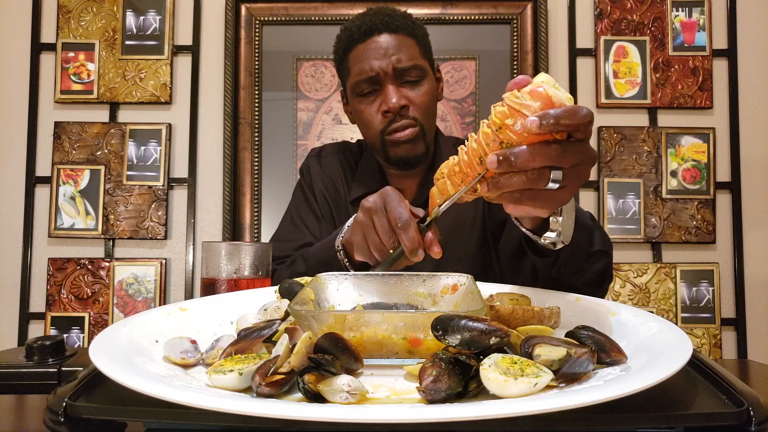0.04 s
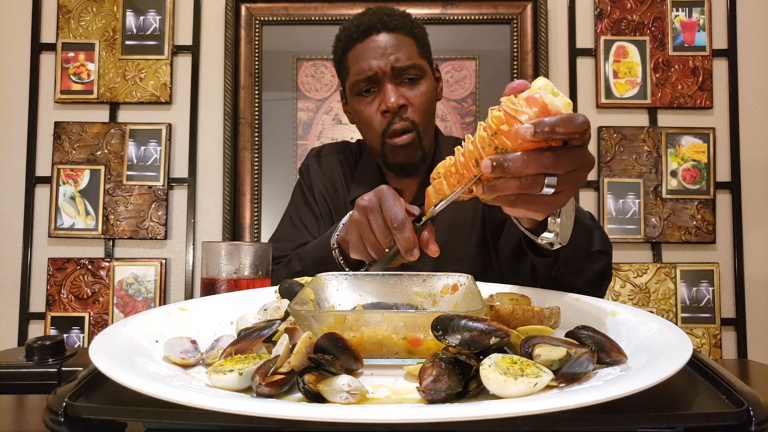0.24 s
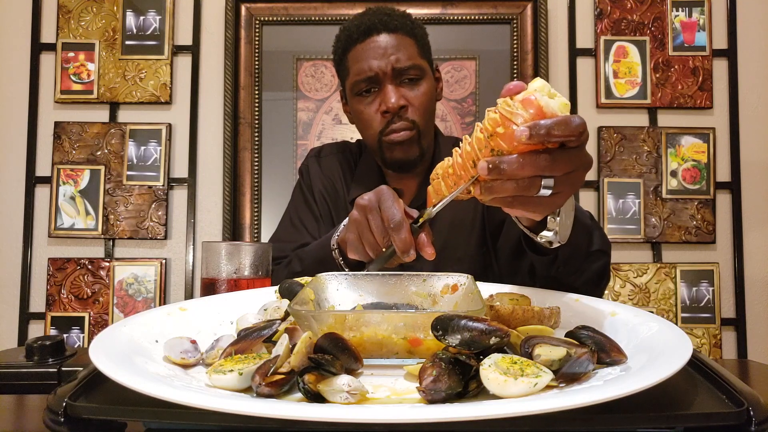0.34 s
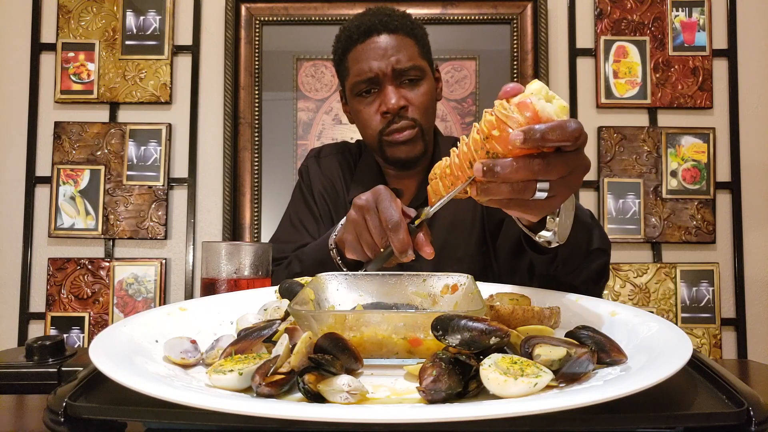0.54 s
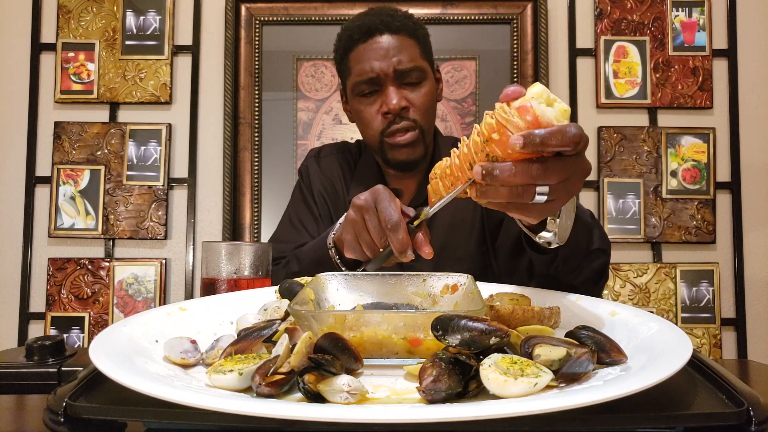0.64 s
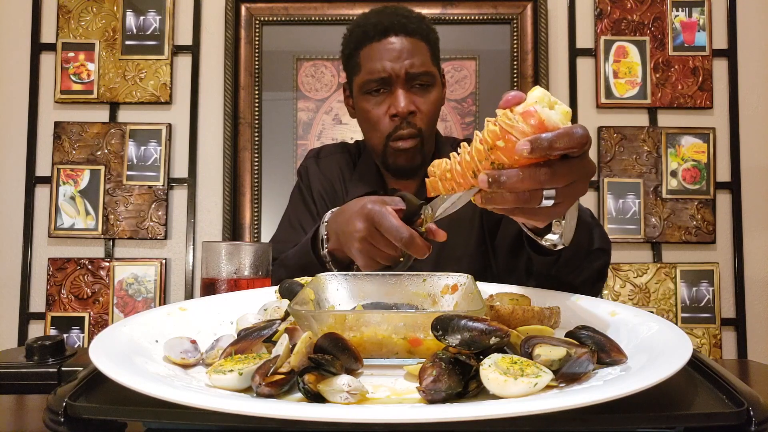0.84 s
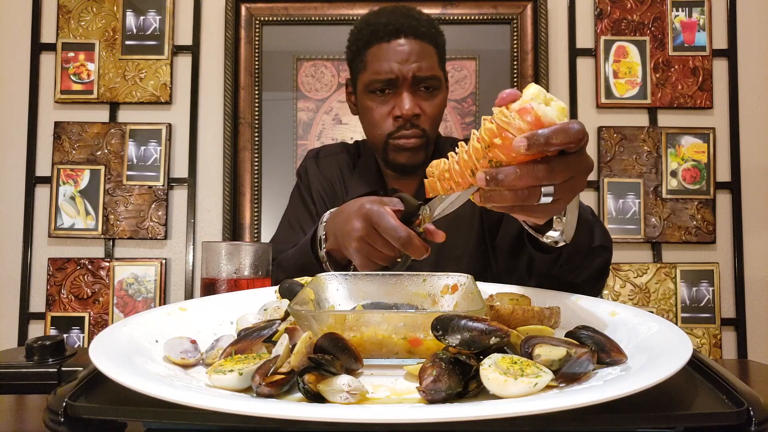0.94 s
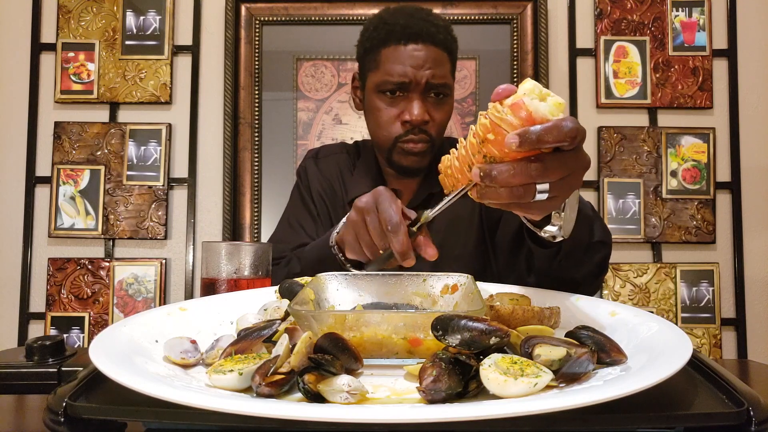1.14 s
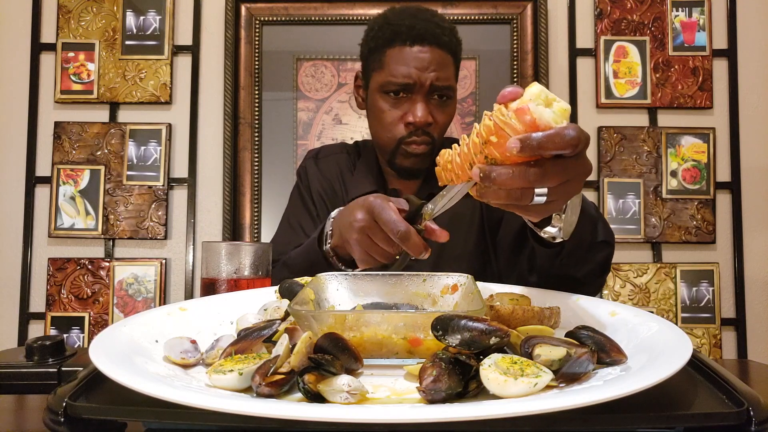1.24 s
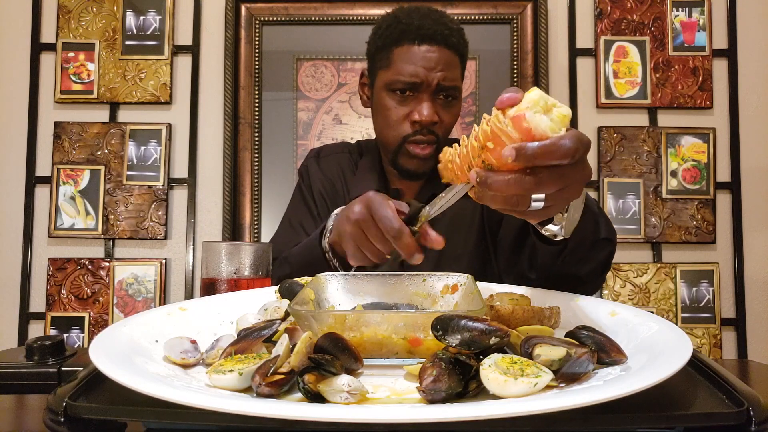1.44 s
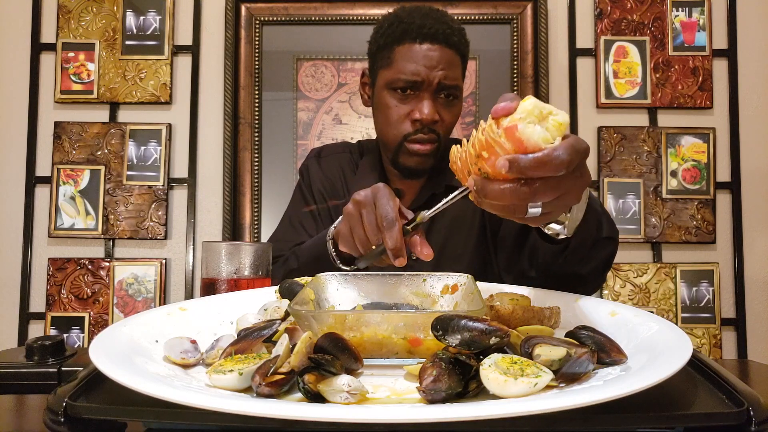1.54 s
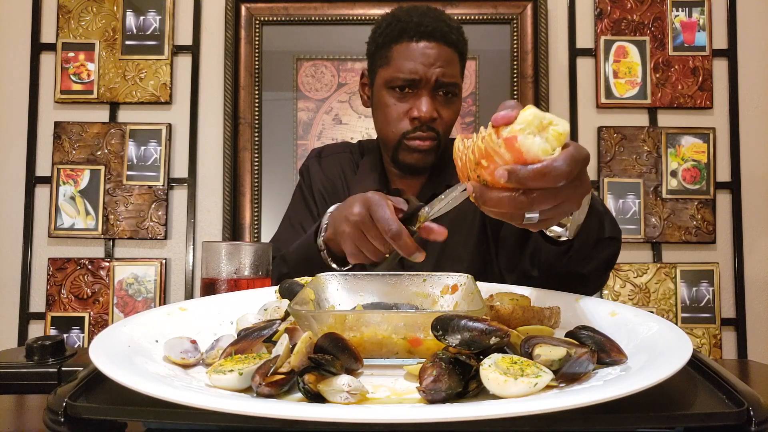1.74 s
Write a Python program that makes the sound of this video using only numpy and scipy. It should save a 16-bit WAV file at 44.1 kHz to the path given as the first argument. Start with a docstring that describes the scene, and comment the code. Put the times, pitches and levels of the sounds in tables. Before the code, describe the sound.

Kitchen shears cut a hollow lobster shell at arm's length from the microphone: a loud crunching burst early, another sharp crack around the middle, then a smaller snap, with light ticks and dull bumps between, indoors.

```python
"""A dining table in a small room: kitchen shears work through a lobster shell, an arm's length from the microphone.
Each fracture is a click that rings the hollow shell for a few ms, with a bright tick on top. Dense tiny fractures
crackle between the cuts and swell around some of the big snips; hands bump the table in dull knocks of about one
swing. Single reflections answer each snap after 8 to 42 ms, a short dense tail follows, and shaped noise is the
room tone."""
import sys
import numpy as np
from scipy import signal
from scipy.fft import rfft, irfft
from scipy.io import wavfile

SR = 44100
rng = np.random.default_rng(int(sys.argv[2]) if len(sys.argv) > 2 else 0)


def nominal_scale(level):
    """Amplitude ratio for a level in decibels (scalar or array-like)."""
    x = np.asarray(level, float) / 20
    return 10 ** x


def master_out(mix):
    """Clip the mix to full scale and print it as 16-bit PCM to the path in sys.argv[1]."""
    frames = np.transpose(np.atleast_2d(mix))
    ceiling = np.clip(frames, -1, 1)
    pcm = np.round(ceiling * 32767).astype(np.int16)
    wavfile.write(sys.argv[1], SR, pcm)


N = 79380  # samples, 1.8 s
LEAD_S = 0.1  # run-in that is cut off, so sounds begun at negative times are still ringing at the start


def evened(x):
    """Scales a sound to an rms of 1."""
    return x / np.sqrt(np.mean(x ** 2) + 1e-20)


def like(x, other):
    """Gives x the energy of the other sound."""
    return x * np.linalg.norm(other) / np.linalg.norm(x)


def read(points, hz):
    """Reads a (frequency, value) curve along a log frequency axis."""
    f, value = np.transpose(points)
    return np.interp(np.log(hz + 1), np.log(f + 1), value)


def add(mix, s, sound):
    """Mixes a sound in at a time in seconds, counted from the end of the run-in."""
    part = mix[round((s + LEAD_S) * SR):][:len(sound)]
    part += sound[:len(part)]


def high_pass(hz):
    """Second-order low cut."""
    return signal.butter(2, hz, "high", fs=SR, output="sos")


RING_SAMPLES = 1500
SCATTER = 0.044  # random spread of the mode pitches, as a share of the pitch
ONSET_S = 0.00011  # rise time if the lowest mode were 1 kHz; longer for a lower one


def ring(modes, chance, region=0, reach=99):
    """Decaying sines of alternating sign and slightly shifted pitch, strongest near the struck region; peak 1."""
    hz, db, t60 = np.transpose(modes)[:, :, None]
    t = np.arange(RING_SAMPLES) / SR
    sign = (-1) ** np.arange(len(hz))[:, None]
    octaves_away = np.log2(hz / 1000) - region
    db = db - 6 * (octaves_away / max(reach, 0.15)) ** 2
    shifted_hz = hz * (1 + SCATTER * chance[:len(hz), None])
    y = sign * nominal_scale(db - 60 * t / t60) * np.sin(2 * np.pi * shifted_hz * t)
    y = y.sum(0) * (1 - np.exp(-t * hz.min() / 1000 / ONSET_S))
    return y / abs(y).max()


# Modes of the hollow shell: (mean frequency [Hz], relative level [dB], decay by 60 dB [s])
SHELL_MODES = [(520, 0, 0.011), (659, -4, 0.038), (839, -5, 0.026), (1267, 1.5, 0.0073), (1566, 0, 0.015),
               (1885, 4, 0.0062), (2536, 7, 0.0046), (3350, 1.5, 0.0043), (4304, 3.5, 0.0038)]
# Brittle edge modes of the tick: (mean frequency [Hz], relative level [dB], decay by 60 dB [s])
EDGE_MODES = [(7010, 2, 0.0028), (8443, 0, 0.0052), (9250, -2.5, 0.0043), (10764, 3.5, 0.0035),
              (11300, -4.5, 0.0022), (13150, -6.5, 0.007), (14900, -10, 0.0039)]
# Fractures: (time [s], shell peak level [dB], struck region [octaves above 1 kHz],
# reach to 6 dB down [octaves], tick peak level [dB])
FRACTURES = [(-.05, -9, 0.14, 0.57, -8), (-.045, -11, 1.8, 0.29, -24), (-.04, -11, 1, 1.7, -12.5),
             (0.1087, -26.5, 0.94, 1.57, -58.5), (0.16, -58, 8, .5, -37.5), (.166, -44, 2.2, 0.35, -50),
             (.200, -41.5, -0.5, 0.93, -67), (0.217, -11, 1.42, 0.26, -28), (.2195, -25, -0.32, 0.54, -55),
             (.308, -21, 1.5, 1.18, -26.5), (.352, -8, 1.4, 0.71, -20.5), (.354, -3.5, 1.5, 0.67, -19),
             (.356, -5, 0.56, 0.61, -15.5), (0.3588, -9.5, 1.04, 1.4, -9.5), (.360, -12, -.6, .3, -11.5),
             (.3612, -5.5, 1.3, 0.83, -0.5), (.362, -2.5, 2.7, 1.1, -28), (.364, -4.5, 1.67, 0.73, -6),
             (0.535, -32, 2.5, 0.92, -44), (0.6062, -26, 0.6, 0.28, -52), (.6085, -19.5, 0, .6, -52),
             (0.6476, -24.5, 1.7, 0.63, -24), (0.681, -39.5, -0.2, 0.58, -39), (.684, -23.5, .8, 1.44, -36),
             (.700, -30.5, 0.45, 0.42, -46), (0.703, -53, 1.5, 0.51, -55), (0.7102, -34.5, 1.5, 0.4, -44),
             (0.7535, -29.5, 1.8, .8, -33.5), (.760, -31, 6, 0.28, -27), (0.778, -29.5, 1.5, 0.4, -26),
             (0.883, -58, -5, 0.68, -43), (0.909, -68, 3, 0.71, -35), (.966, -53.5, 1.5, 0.8, -76),
             (1.005, -24.5, 2.53, 1.28, -19.5), (1.0457, -44, 3, 1.1, -60), (1.061, -47, -7, 0.93, -40),
             (1.0722, -11.5, 1.54, 0.59, -7), (1.0769, -6, 1.54, .8, -2.5), (1.0803, -37, .8, 0.41, -13),
             (1.2205, -35.5, 0, 0.59, -54), (1.238, -36, 0.2, 0.59, -83.5),
             (1.302, -43.5, 1.9, 0.21, -75.5), (1.311, -38, 0.3, 0.46, -64), (1.3147, -38.5, 0, 0.85, -64),
             (1.3495, -41, 0.8, 0.38, -62), (1.426, -60, 3.3, 0.83, -69.5), (1.455, -66, 1, .6, -56),
             (1.4595, -66, -13.5, .6, -69), (1.469, -47.5, 1, .5, -56), (1.4745, -48, 1, 1.1, -41),
             (1.497, -39.5, 0.8, 0.73, -69), (1.514, -62, 4, 0.8, -46), (1.5178, -58, 1, .6, -42),
             (1.5365, -30, 0.44, 0.65, -52), (1.5421, -16, 1.8, 0.25, -10),
             (1.5425, -13.5, 0.42, 0.51, -24.5), (1.703, -50, 4, .6, -34)]
BREAK_S = 0.00008  # decay time of the ragged break
BLUR = 1.48  # summed over all directions, a fracture reaches over more of the modes
SPREAD_LOW_HZ, SPREAD_TICK_DB = 2620, -2.5  # and its tick is even above a low cut


def fractures(size):
    """Row 0, to the microphone: a ragged break rings the edge modes, shell modes ring alongside. Row 1: to the room."""
    out = np.zeros((2, size))
    chances = rng.standard_normal((len(FRACTURES), 100))
    even_click = signal.sosfilt(high_pass(SPREAD_LOW_HZ), np.arange(RING_SAMPLES) == 0)
    for (s, shell_db, region, reach, tick_db), chance in zip(FRACTURES, chances):
        ragged = chance[20:] * np.exp(-np.arange(80) / SR / BREAK_S)
        tick = np.convolve(ragged, ring(EDGE_MODES, chance[10:]))[:RING_SAMPLES]
        tick = nominal_scale(tick_db) * tick / abs(tick).max()
        body = nominal_scale(shell_db) * ring(SHELL_MODES, chance, region, reach)
        add(out[0], s, body + tick)
        spread_body = like(ring(SHELL_MODES, -chance, region, reach * BLUR), body)
        spread_tick = nominal_scale(SPREAD_TICK_DB) * like(even_click, tick)
        add(out[1], s, spread_body + spread_tick)
    return out


# Blade pressure, heard as crackle that swells around some of the big snips: (time [s], level [dB])
PRESSURE = [(0, -50), (.2, -70), (0.299, -69.5), (.35, -57), (.356, -19), (0.378, -25), (0.419, -56),
            (.55, -53), (.62, -52), (.72, -64.5), (0.781, -42), (.84, -68), (1, -63), (1.04, -48.5),
            (1.071, -54), (1.08, -23.5), (1.098, -36), (1.14, -43), (1.2, -51), (1.33, -78.5),
            (1.451, -69.5), (1.481, -54), (1.538, -58.5), (1.547, -37.5), (1.565, -39), (1.6, -53.5),
            (1.7, -65.5), (1.8, -61.5)]
CRACKLE_PER_S = 1200  # mean rate over all three regions
CRACKLE_SPREAD_DB, CRACKLE_TICK_DB = 4.5, -8.5  # scale of the random click levels; tick against shell


def crackle(size):
    """Tiny random fractures, low, middle or high on the shell modes, follow the blade pressure."""
    out = np.zeros(size)
    for region in (0.2, 1.1, 1.8):  # octaves above 1 kHz
        strength = nominal_scale(CRACKLE_SPREAD_DB * np.minimum(rng.exponential(1, size), 4))
        clicks = strength * (rng.random(size) < CRACKLE_PER_S / 3 / SR)
        chance = rng.standard_normal(20)
        body = ring(SHELL_MODES, chance, region, 0.86)
        tick = nominal_scale(CRACKLE_TICK_DB) * ring(EDGE_MODES, chance[10:])
        out += signal.oaconvolve(clicks, body + tick)[:size]
    s, db = np.transpose(PRESSURE)
    return evened(out) * nominal_scale(np.interp(np.arange(size) / SR - LEAD_S, s, db))


# Bumps through hand and table: (time [s], relative level [dB], settled pitch [Hz])
BUMPS = [(-.03, -21.5, 310), (.1, -53.5, 70.6), (.219, -33.5, 324), (0.36, -53, 202), (.443, -25, 190),
         (0.488, -48.5, 70), (.608, -40.5, 423), (.696, -36, 306), (0.744, -40.5, 320), (0.944, -50.5, 252),
         (0.966, -45.5, 260), (.986, -44, 300), (1.008, -25, 187), (1.0465, -40, 400), (1.055, -61.5, 252),
         (1.078, -44, 320), (1.099, -51, 67.6), (1.221, -44, 342), (1.51, -53, 248), (1.539, -48.5, 182),
         (1.781, -53.5, 242)]
BUMP_TURNS, BUMP_CUT = 0.68, 0.43  # decay in swings; low cut as a share of the pitch
BUMP_SAG, BUMP_SAG_S = 0.29, 0.0017  # extra swings at the start, as the pitch falls after contact


def bumps(size):
    """Dull knocks of little more than one swing, their pitch falling after contact."""
    out = np.zeros(size)
    t = np.arange(4000) / SR
    for s, db, hz in BUMPS:
        turns = t * hz + BUMP_SAG * (1 - np.exp(-t / BUMP_SAG_S))
        swing = -2 * nominal_scale(db) * np.sin(2 * np.pi * turns)
        push = swing * np.exp(-turns / BUMP_TURNS) * np.minimum(turns * 20, 1)
        add(out, s, signal.sosfilt(high_pass(BUMP_CUT * hz), push))
    return out


# Decay of the tail: (frequency [Hz], decay by 60 dB [s])
TAIL_DECAY = [(150, 1), (500, 0.41), (900, 0.45), (1600, 0.47), (3000, 0.45), (7000, 0.4), (14000, 0.37)]
# Colour of the tail at its start: (frequency [Hz], relative level [dB])
TAIL_COLOUR = [(100, -20), (400, 4.5), (800, 1), (1600, 3.5), (3000, 1), (5500, 8), (9000, 9), (15000, 1)]
# First reflections, delays: (time [s])
ECHO_S = [.008, .0115, .0132, .0204, .033, .042]
# First reflections, in the same order: (level [dB])
ECHO_DB = [-23.5, -16, -23, -16.5, -25.5, -19.5]
TAIL_DB, TAIL_START_S, TAIL_RISE_S = -5, 0.0036, 0.0022


def room(near, spread):
    """A few single reflections of the near sound, and a dense tail of the spread sound dying band by band."""
    size = SR * 3 // 4
    hz, t, z = signal.stft(rng.standard_normal(size), SR, nperseg=256)
    z = z * nominal_scale(read(TAIL_COLOUR, hz)[:, None] - 60 * t / read(TAIL_DECAY, hz)[:, None])
    tail = signal.istft(z, SR, nperseg=256)[1][:size]
    tail = tail * np.clip((np.arange(size) / SR - TAIL_START_S) / TAIL_RISE_S, 0, 1)
    tail = nominal_scale(TAIL_DB) * tail / np.linalg.norm(tail)
    echoes = np.zeros(3000)
    for delay, db in zip(ECHO_S, ECHO_DB):
        echoes[round(delay * SR)] += nominal_scale(db)
    early = signal.fftconvolve(near, echoes)[:len(near)]
    late = signal.fftconvolve(spread, tail)[:len(near)]
    return early + late


# Colour of the steady room tone: (frequency [Hz], relative level per Hz [dB])
AIR_COLOUR = [(20, 3), (60, 7.5), (120, 6.5), (250, -1), (420, -8.5), (700, -2), (1550, -8.5), (4200, -18),
              (5500, -5.5), (8000, -19.5), (12000, -15.5), (16000, -28)]
AIR_DB = -61.5  # rms


def air():
    """Steady room tone: random noise shaped in frequency."""
    z = rfft(rng.standard_normal(N)) * nominal_scale(read(AIR_COLOUR, np.fft.rfftfreq(N, 1 / SR)))
    return nominal_scale(AIR_DB) * evened(irfft(z, N))


def scene():
    """Shell and table, the room's answer to both, and the room tone."""
    lead = round(LEAD_S * SR)
    shell = fractures(N + lead) + crackle(N + lead)
    shell = signal.sosfilt(high_pass(300), shell)  # the small shell radiates little below 300 Hz
    near, spread = shell + bumps(N + lead)
    wet = near + room(near, spread)
    return (wet[lead:] + air())[None]


def low_pass(x):
    """Removes everything above the highest recorded frequency."""
    return signal.sosfilt(signal.butter(12, 16850, fs=SR, output="sos"), x)


def record(dry):
    """Band limit at 16.1 kHz, then a full-scale ceiling."""
    limited = signal.oaconvolve(dry, signal.firwin(255, 16100, fs=SR)[None], "same")
    mix = np.clip(limited, -1, 1)
    return low_pass(mix)


dry = scene()
out = record(dry)
master_out(out)
```